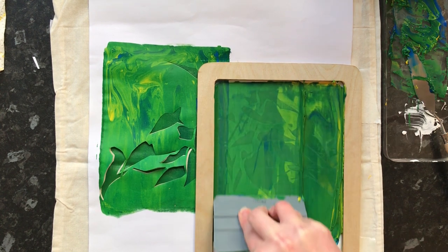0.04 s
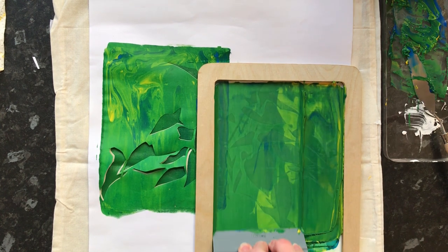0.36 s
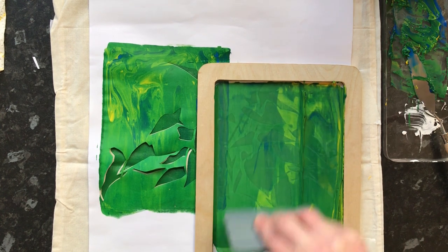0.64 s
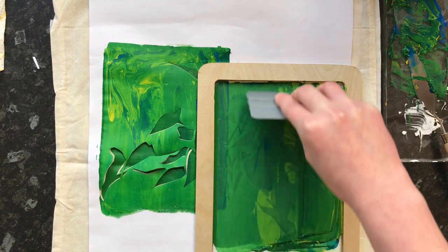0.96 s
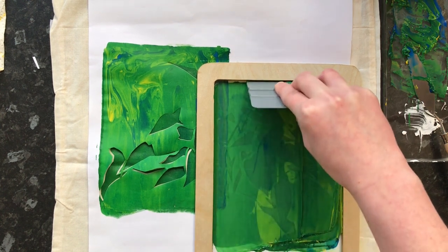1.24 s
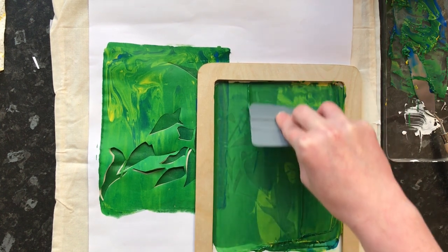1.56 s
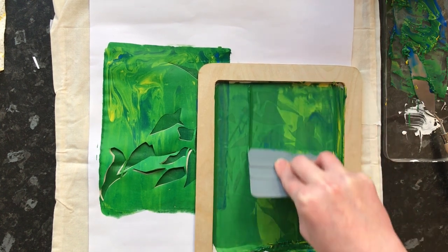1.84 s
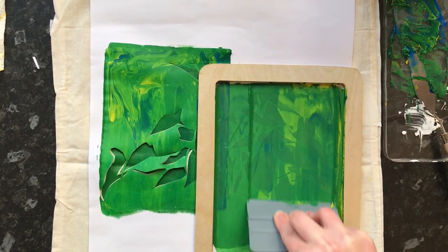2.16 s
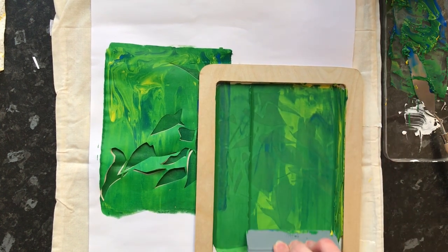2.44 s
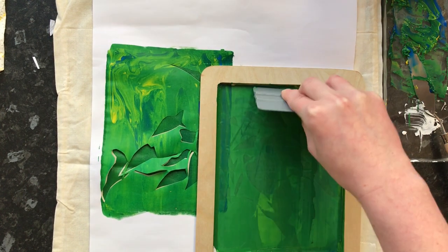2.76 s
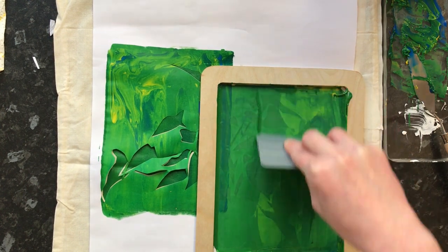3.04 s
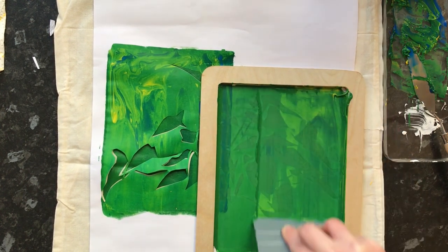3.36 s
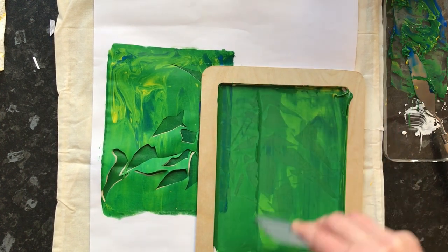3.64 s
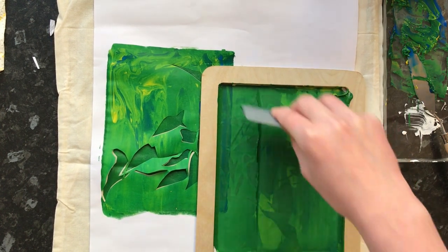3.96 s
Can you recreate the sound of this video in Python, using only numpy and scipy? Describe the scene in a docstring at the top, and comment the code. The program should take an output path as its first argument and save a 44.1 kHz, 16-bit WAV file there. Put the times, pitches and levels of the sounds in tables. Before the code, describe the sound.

Close up in a small room, a squeegee scrapes over a printing screen in three strokes, each with a wavering squeak. The blade taps down between strokes, the wooden frame bumps the table, and the final squeak is highest.

```python
"""A plastic squeegee is pulled three times down an inked printing screen on a table, close and in mono.
The blade hisses over the mesh and sticks and slips: a rough squeak whose pitch follows the pull,
loudest the third time. Between pulls it is carried back and set down with a tap.
The stretched mesh rings along; the wooden frame thumps and rumbles in a small, live room."""
import sys
import numpy as np
from scipy import signal
from scipy.fft import rfft, irfft, next_fast_len
from scipy.io import wavfile
from scipy.ndimage import map_coordinates

SR = 44100
rng = np.random.default_rng(int(sys.argv[2]) if len(sys.argv) > 2 else 0)


def waveform_to_disk(signal):
    """Save audio, clipped to [-1, 1], as 16-bit WAV at the path in sys.argv[1]."""
    frames = np.transpose(np.atleast_2d(signal))
    scaled = np.clip(frames, -1, 1) * 32767
    samples = np.round(scaled).astype(np.int16)
    wavfile.write(sys.argv[1], SR, samples)


N = 176400
T = np.arange(N) / SR

# Stick-slip of each pull (time [s], slip rate [Hz], fundamental drive [dB], octave drive [dB])
SQUEAK_1 = [(0.0, 1014, -29, -46), (0.02, 961, -34.5, -51), (0.036, 866.6, -33, -44.5),
            (0.118, 721.4, -34, -38), (0.214, 670.6, -35.5, -43.5), (0.256, 630, -39, -42),
            (0.316, 664, -46, -55), (0.462, 635, -62, -51), (0.5, 703, -45.5, -56)]
SQUEAK_2 = [(1.41, 265.3, -45, -59), (1.476, 546.3, -41, -55), (1.526, 745, -47, -53.5),
            (1.596, 941, -43, -55.5), (1.656, 1033, -47, -58), (1.868, 1010, -42.5, -61),
            (1.958, 902.4, -39.5, -63), (2.064, 945.3, -40.5, -63), (2.234, 947.6, -42, -58),
            (2.28, 779, -34, -62), (2.3, 899, -30, -44), (2.354, 628.4, -34, -49),
            (2.47, 596.6, -32.5, -39), (2.492, 623.7, -42.5, -51), (2.548, 572.6, -29, -35.5),
            (2.59, 571, -37.5, -52), (2.68, 652, -38, -42)]
SQUEAK_3 = [(3.03, 1537, -45, -58), (3.054, 1503, -37, -56), (3.076, 1605, -43.5, -49),
            (3.132, 1627, -34.5, -45), (3.16, 1934, -34.5, -57), (3.24, 1913, -24, -34),
            (3.292, 1743, -25, -35.5), (3.374, 1347, -19.5, -30), (3.438, 1173, -26.5, -36),
            (3.496, 1144, -20.5, -30), (3.56, 1158, -29.5, -45)]
# Friction of each pull (time [s], friction drive [dB], rasp offset [dB])
FRICTION_1 = [(0.0, -46.5, -2), (0.33, -51, 1), (0.468, -49, 2), (0.518, -41.5, -3), (0.546, -42, 1),
              (0.578, -59, 1), (0.6, -54, -13)]
FRICTION_2 = [(1.39, -76, 0.0057), (1.408, -51.5, 0), (1.436, -47.5, 0), (1.578, -44, 0), (2.248, -43.5, 0),
              (2.512, -48.5, 0), (2.556, -45, 0), (2.584, -53.5, 0), (2.646, -41, 0), (2.686, -44.5, 0),
              (2.69, -47, 0)]
FRICTION_3 = [(2.86, -80, 3), (2.87, -49.5, 2.4), (2.908, -44, 6.9), (3.218, -37.5, 1.8), (3.254, -36, 1.6),
              (3.268, -37.5, 2), (3.542, -40, 5.8), (3.6, -56, 3)]
# Tone colour of each layer (frequency [Hz], gain [dB])
SQUEAK_EQ = [(300,-1.5),(520,-5),(640,0),(780,-1),(1000,5),(1170,-1),(1500,1),(1900,0.5),(2120,-3),(2400,8),(2700,2.5),(2900,3.5),(3600,2.5),(4300,7.5),(5000,-4),(5800,7),(9000,-5)]
SOFT_HISS_EQ = [(1760, -37), (3000, -11), (3190, -3), (3470, -8), (4380, -4.5), (4990, -6), (5610, -4),
                (6710, -1.5), (7970, -6), (9530, -5), (10400, -9.5), (13100, -4), (15000, -4.5),
                (15500, -9)]  # blade on mesh, first two pulls
HARD_HISS_EQ = [(2650, -35), (4500, -3.5), (5230, -5), (5710, -1.5), (7140, -2), (7840, -5.5), (9690, -5.5),
                (10500, -10), (11400, -6), (12900, -5), (15500, -6.5)]  # blade on mesh, last pull
RASP_EQ = [(150,-27),(520,-19.5),(650,-3.5),(820,-6),(1100,-1),(1300,-4),(1550,-2.5),(2080,-3),(2450,-1.5),(2800,-3),(3250,-3.5),(4300,-7.5),(7000,-30)]
RUMBLE_EQ = [(20,-63),(35,-42),(46,2),(55,3.5),(68,-3),(85,5),(135,-19.5),(175,-10),(260,-22),(500,-20),(1200,-52)]  # frame and stretched mesh
ROOM_TONE_EQ = [(20,-48),(33,-31),(44,-8.5),(54,-2.5),(66,-4.5),(86,-1.5),(112,-2.5),(140,-16),(180,-9.5),(240,-18.5),(550,-25),(850,-23.5),(1500,-32.5),(3000,-33),(7000,-38.5),(10300,-42.5),(12000,-38),(15500,-41)]
SWISH_EQ = [(300,-22),(800,2),(1500,1),(2150,-6),(2400,8),(2750,-4),(4200,-2),(7000,-7),(10400,-9),(11800,2),(15500,-4)]  # the arm carries the squeegee back
SCUFF_EQ = [(600,-18),(1050,3),(1500,-12),(2000,-3),(3200,-6.5),(4500,-12),(6500,-7),(9000,-15),(15500,-15)]  # the blade brushes the mesh as it is set down
# Modes of the stretched mesh (frequency [Hz], gain over the direct sound [dB])
MESH_MODES = [(410,-1),(644,-4.5),(1063,-2.5),(1167,-16),(1338,-9),(1465,0),(1505,-1),(1607,-4),(1735,-2),(1916,-2.5),(2385,-7),(2850,1),(2975,-6)]
# The room's decay (frequency [Hz], t60 [s])
ROOM_DECAY = [(100,0.39),(500,0.26),(1200,0.53),(2500,0.47),(5000,0.37),(14000,0.13)]
# The frame is pressed against the table (time [s], level [dB])
FRAME_PUSHES = [(0.137,-32),(1.226,-35.5),(1.40,-41),(1.599,-38.5),(1.875,-35)]
# Modes of the wooden frame (frequency [Hz], gain [dB], t60 [s])
FRAME_MODES = [(57,2.5,0.34),(83.5,-3,0.27),(160,-10,0.16)]
# Short noises of the blade (peak time [s], half-width [s], level [dB], centre [Hz])
EDGE_TAPS = [(0.534,.04,-47.5,2407), (1.202,0.0082,-41.5,2050), (2.296,0.011,-37,2200),
             (2.655,0.027,-40.5,1389), (3.545,0.017,-35,2870)]  # its edge taps or catches
DRAG_JUDDERS = [(1.412,.014,-44.5,276),(1.45,0.035,-50,400),(2.52,0.044,-37.5,402),(2.59,0.032,-40,169),(2.888,0.026,-39.5,209.6),(2.97,0.11,-44.5,240)]  # it drags slowly and judders

CONTACT_FADE_S = 0.011  # the blade takes hold or lets go
CUT_S, CUT_FADE_S = 2.692, 0.0034  # the second pull and its reverb break off
MESH_WIDTH_HZ, TOP_HZ = 13, 15750


def amp(db):
    """Decibels to gain."""
    return 10 ** (np.asarray(db) / 20)


def unit(x):
    """x at rms 1."""
    return x / np.sqrt(np.mean(x ** 2) + 1e-20)


def along(points, hz):
    """Reads a curve of (frequency [Hz], value) on a log axis."""
    freqs, values = np.transpose(points)
    return np.interp(np.log(hz + 1), np.log(freqs + 1), values)


def envelopes(rows):
    """A contact gate, then an envelope for each column after time."""
    times, *columns = np.transpose(rows)
    gate = np.clip(1 + np.minimum(T - times[0], times[-1] - T) / CONTACT_FADE_S, 0, 1)
    return [gate] + [np.interp(T, times, column) for column in columns]


def wobble(rate, t=T):
    """Smooth random modulation, rate knots a second."""
    return map_coordinates(rng.standard_normal(N // 16), [t * rate], mode="wrap", order=2)


def filtered(x, response):
    """x through a frequency response."""
    size = next_fast_len(N + SR // 2)
    return irfft(rfft(x, size) * response(np.fft.rfftfreq(size, 1 / SR)), size)[:N]


def resonance(f, centre, width):
    """Response of one mode, 1 at its centre."""
    return 1j * f * width / (centre ** 2 - f ** 2 + 1j * f * width)


def noise(eq, grain_db=0):
    """Coloured noise of rms 1; grain_db makes it gritty."""
    grains = rng.standard_normal(N) * amp(grain_db * wobble(1500))
    return unit(filtered(grains, lambda hz: amp(along(eq, hz))))


def squeak(rows, jitter, waver, flutter_db, chatter_db, upper_db, rolloff_db, skip_db, gain_db):
    """The blade sticks and slips unsteadily; stray slips blur each harmonic, skipped ones fall between."""
    controls = np.array(envelopes(rows))
    touching = controls[0] > 0
    gate, slip_hz, fundamental_db, octave_db = controls[:, touching]
    t = T[touching]
    unsteady_hz = slip_hz * (1 + jitter * wobble(600, t) + waver * wobble(70, t))
    phase = 2 * np.pi * np.cumsum(unsteady_hz) / SR
    grip_db = flutter_db * wobble(130, t)

    def blur(k):
        """A noise band riding at k times the slip rate."""
        return wobble(380, t) * np.sin(k * phase) + wobble(380, t) * np.cos(k * phase)

    slips = amp(fundamental_db + skip_db) * (blur(0.5) + blur(1.5))
    for k in range(1, 5):
        db = fundamental_db if k == 1 else octave_db + upper_db + rolloff_db * np.sqrt(k - 2)
        flutter = unit(amp(grip_db + 2.5 * wobble(220, t)))
        tone = flutter * np.sin(k * phase + 0.5 * wobble(130, t))
        slips += amp(db) * (tone + k * amp(chatter_db) * blur(k))
    out = np.zeros(N)
    out[touching] = np.sqrt(2) * amp(gain_db) * gate * slips
    return filtered(out, lambda hz: amp(along(SQUEAK_EQ, hz)))


def scrape(rows, hiss_eq, hiss_db, rasp_db, rumble_db, fade_db_per_s):
    """The edge runs over the threads: fine hiss, gritty rasp and a frame rumble fading along the pull."""
    gate, friction_db, coarse_db = envelopes(rows)
    friction = gate * amp(friction_db + 0.55 * wobble(40))
    hiss = amp(hiss_db) * noise(hiss_eq, grain_db=0.5)
    rasp = amp(rasp_db + coarse_db) * noise(RASP_EQ, grain_db=2.5)
    rumble = amp(rumble_db - fade_db_per_s * (T - rows[0][0])) * noise(RUMBLE_EQ)
    return friction * (hiss + rasp) + gate * rumble


def mesh_ring(x):
    """The stretched mesh carries the sound and rings along in narrow modes."""
    return filtered(x, lambda f: 1 + sum(amp(db) * resonance(f, hz, MESH_WIDTH_HZ) for hz, db in MESH_MODES))


def room(x, wet_db):
    """Mixes in the room's tail, each frequency dying at its own speed."""
    hz, t, spectrum = signal.stft(rng.standard_normal(SR * 2 // 3), SR, nperseg=256)
    decay = amp(-60 * t / along(ROOM_DECAY, hz)[:, None])
    tail = signal.istft(spectrum * decay, SR, nperseg=256)[1]
    impulse = np.pad(tail, (SR // 250, 0)) / np.linalg.norm(tail)  # 4 ms pre-delay
    reverb = signal.fftconvolve(x, impulse)[:N]
    return (x + amp(wet_db) * reverb) / np.hypot(1, amp(wet_db))


def room_tone(level_db):
    """The room's steady bed of low rumble and faint hiss."""
    return amp(level_db) * noise(ROOM_TONE_EQ)


def frame_thumps():
    """Soft pushes ring the frame's low modes."""
    out = np.zeros(N)
    for start, push_db in FRAME_PUSHES:
        age = np.maximum(T - start, 0)
        attack = 1 - np.exp(-age / 0.0028)
        for hz, mode_db, t60 in FRAME_MODES:
            out += amp(push_db + mode_db - 60 * age / t60) * np.sin(2 * np.pi * hz * age) * attack
    return out


def blade_bursts(rows, q):
    """Taps or judders: short clusters of slips, each through a broad, steep-sided resonance."""
    out = np.zeros(N)
    for peak_s, half_width_s, db, hz in rows:
        swell = np.exp(-2 * ((T - peak_s) / half_width_s) ** 2)
        band = filtered(rng.standard_normal(N), lambda f: resonance(f, hz, hz / q) ** 2)
        out += amp(db) * swell * unit(band)
    return out


def rustle(eq, peak_s, half_width_s, level_db):
    """A faint brush of arm or blade that swells and fades."""
    swell = np.exp(-((T - peak_s) / half_width_s) ** 2)
    return amp(level_db) * swell * noise(eq, grain_db=1)


def scene():
    """Three pulls with knocks and handling noise, over the room tone."""
    first = squeak(SQUEAK_1, jitter=0.069, waver=0.025, flutter_db=2.5, chatter_db=-9.5,
                   upper_db=-4, rolloff_db=-17, skip_db=-26, gain_db=-1.5)
    second = squeak(SQUEAK_2, jitter=0.0492, waver=0.03296, flutter_db=2.5, chatter_db=-13.5,
                    upper_db=2, rolloff_db=-16.5, skip_db=-19, gain_db=-0.5)
    third = squeak(SQUEAK_3, jitter=0.033, waver=0.0098, flutter_db=2, chatter_db=-17.5,
                   upper_db=4.5, rolloff_db=-14.5, skip_db=-33.5, gain_db=-1.5)
    first += scrape(FRICTION_1, SOFT_HISS_EQ, hiss_db=1, rasp_db=-0.5, rumble_db=-38, fade_db_per_s=12.5)
    second += scrape(FRICTION_2, SOFT_HISS_EQ, hiss_db=0, rasp_db=-1.5, rumble_db=-40, fade_db_per_s=6)
    third += scrape(FRICTION_3, HARD_HISS_EQ, hiss_db=2, rasp_db=-0.5, rumble_db=-46, fade_db_per_s=9)
    cut = np.clip((CUT_S - T) / CUT_FADE_S + 1, 0, 1)
    pulls = room(mesh_ring(first + second), wet_db=-9.5) * cut
    pulls += room(mesh_ring(third), wet_db=-12.5)
    taps = blade_bursts(EDGE_TAPS, q=1.24)
    judders = blade_bursts(DRAG_JUDDERS, q=1.54)
    knocks = room(taps + judders, wet_db=-15.5) + frame_thumps()
    carry_back = rustle(SWISH_EQ, peak_s=0.79, half_width_s=0.27, level_db=-57)
    set_down = rustle(SCUFF_EQ, peak_s=1.216, half_width_s=0.048, level_db=-50)
    mono = pulls + knocks + carry_back + set_down + room_tone(level_db=-47)
    return np.array([mono, mono])


def record(dry):
    """A brick-wall low-pass takes off the very top."""
    return np.array([filtered(x, lambda hz: hz < TOP_HZ) for x in dry])


dry = scene()
out = record(dry)
waveform_to_disk(out)
```